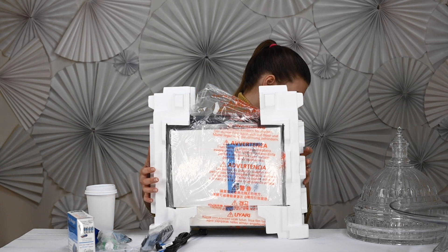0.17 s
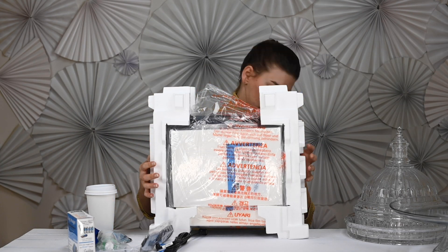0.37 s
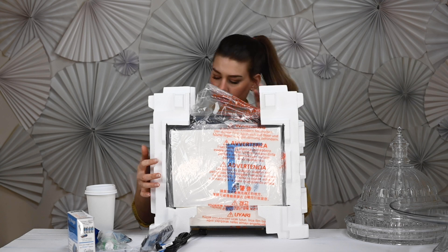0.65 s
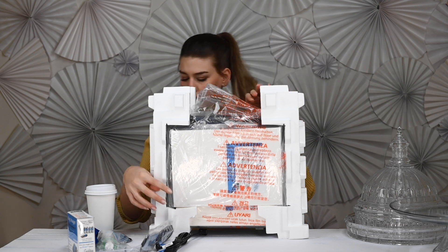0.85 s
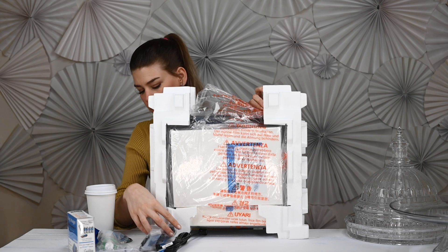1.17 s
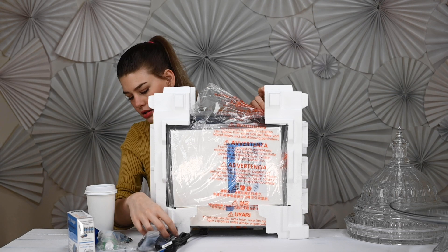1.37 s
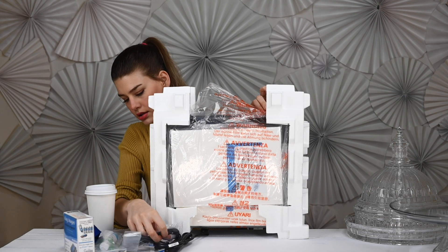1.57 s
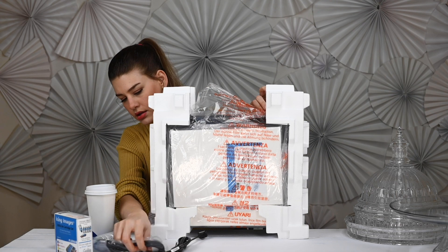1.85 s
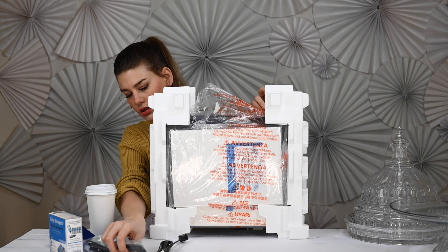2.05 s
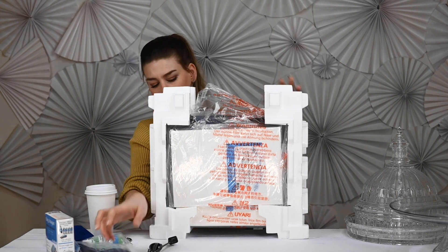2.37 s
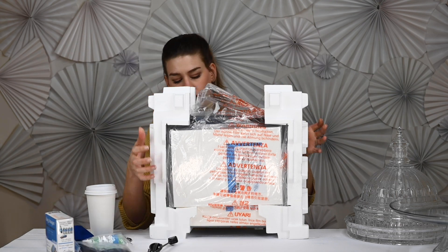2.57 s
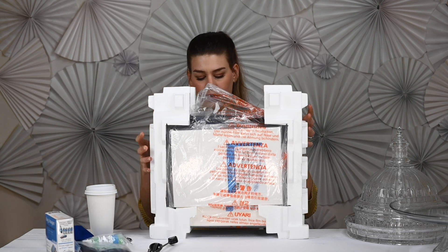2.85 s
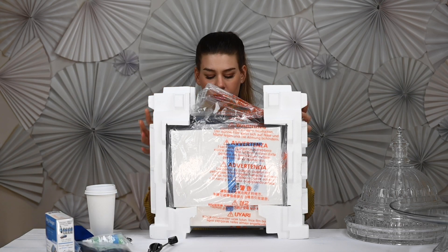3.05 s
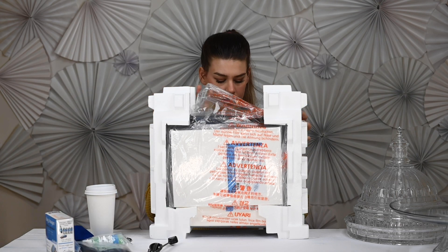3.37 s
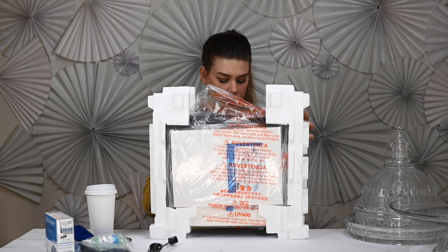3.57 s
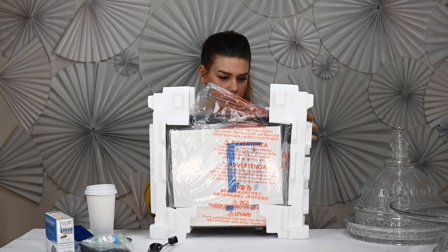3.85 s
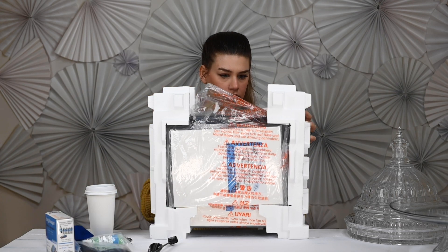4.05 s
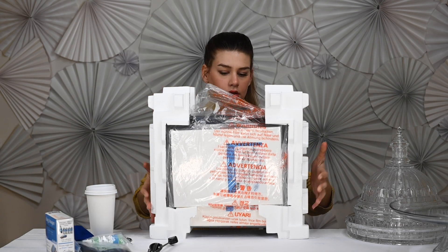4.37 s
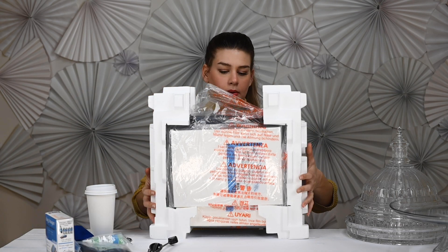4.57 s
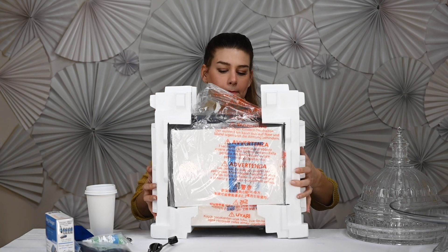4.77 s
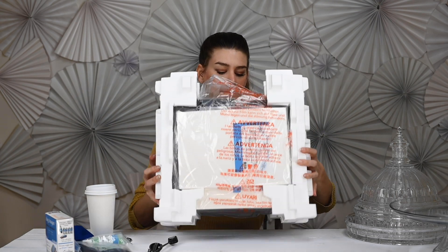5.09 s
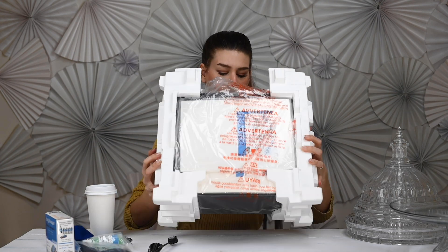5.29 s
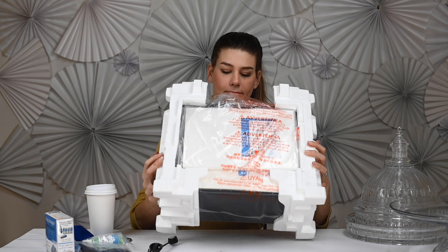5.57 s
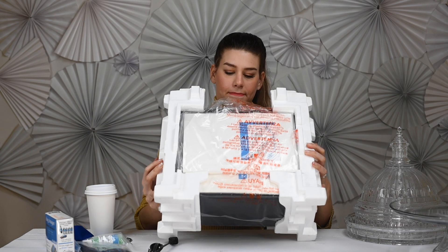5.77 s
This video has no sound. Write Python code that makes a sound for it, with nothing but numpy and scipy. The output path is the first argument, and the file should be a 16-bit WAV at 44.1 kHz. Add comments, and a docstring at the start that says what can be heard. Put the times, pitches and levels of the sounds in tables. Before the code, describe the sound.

Hands rub and crinkle plastic film over foam packing, small items drag across a table, then the package is lifted with creaking foam.

```python
"""Handling a wrapped package

Hands rub and grip a plastic-wrapped appliance held in foam packing blocks, on a table in a small room.
Rubbing is noisy friction; the film crinkles and snaps as short bursts that set resonances ringing.
Things slid across the tabletop make it drone, and the foam bumps and squeaks in gliding notes.
When the package is lifted, the foam creaks in separate slips whose treble arrives first."""
import sys
import numpy as np
from scipy import signal
from scipy.fft import rfft, irfft
from scipy.io import wavfile

SR = 44100
rng = np.random.default_rng(int(sys.argv[2]) if len(sys.argv) > 2 else 0)


def unload_wav(signal):
    """Save mono or channel-first audio to the path in sys.argv[1] as 16-bit WAV at rate SR, clipped to [-1, 1]."""
    wavfile.write(
        sys.argv[1],
        SR,
        np.round(np.clip(np.atleast_2d(signal).T, -1, 1) * 32767).astype(np.int16),
    )


N = 261072
TIME = np.arange(N) / SR
TOP_LIMIT_HZ = 16150  # upper edge of the whole sound


def amp(db):
    """Turns decibels into gain."""
    return 10 ** (np.asarray(db) / 20)


def unit(x):
    """Scales a sound to an rms (average strength) of 1."""
    return x / np.sqrt(np.mean(x ** 2) + 1e-20)


def read(points, hz):
    """Reads a (Hz, value) table along a log-frequency axis."""
    table_hz, value = np.transpose(points)
    return np.interp(np.log(hz + 1), np.log(table_hz), value)


def curve(rows):
    """Gives each column of a timed table at every sample, with straight lines between rows."""
    s, *columns = np.transpose(rows)
    return [np.interp(TIME, s, column) for column in columns]


def add(mix, s, sound):
    """Mixes a sound in at time s (seconds)."""
    part = mix[round(s * SR):][:len(sound)]
    part += sound[:len(part)]


def band(x, order, hz, kind="low"):
    """Keeps only part of the spectrum, with a Butterworth filter."""
    return signal.sosfilt(signal.butter(order, hz, kind, fs=SR, output="sos"), x)


def colour(x, points, size=4096):
    """Gives a sound the listed spectrum without any pre-echo, so that clicks stay sharp."""
    gain_db = read(points, abs(np.fft.fftfreq(size, 1 / SR)))
    log_gain = np.log(amp(gain_db))
    # minimum phase: the response starts at once
    taps = np.fft.ifft(np.exp(np.conj(signal.hilbert(log_gain)))).real
    return signal.fftconvolve(x, taps[:size // 2])[:len(x)]


def ring(x, modes):
    """Drives a set of resonances, each given as (Hz, width in Hz, dB)."""
    out = 0
    for hz, width, db in modes:
        b, a = signal.iirpeak(min(hz, SR / 3), hz / width, SR)
        out = out + amp(db) * signal.lfilter(b, a, x)
    return out


def wander(rate_hz):
    """Makes a smooth random drift of rms 1."""
    return unit(band(rng.standard_normal(N), 2, rate_hz))


def grains(per_s, spread_db, cap=1.8):
    """Makes tiny random releases of friction: many small, a few large."""
    size = amp(spread_db * np.minimum(rng.exponential(1, N), cap))
    sign = rng.choice([-1, 1], N)
    happens = rng.random(N) < per_s / SR
    return unit(size * sign * happens)


def gesture(start, rise, hold):
    """Gain of one movement of the hand: it gathers speed, sags a little, then dies away."""
    onset_db, sag_db_per_s, contact_s = -18, -15, .04
    # slow movements also end slowly
    release_db, release_s, release_per_rise, release_bend = -22, 0.052, 0.68, 1.27
    t = TIME - start
    gathering = np.clip(1 - t / max(rise, .001), 0, None) ** 1.5
    ending = np.maximum(t - rise - hold, 0) / (release_s + release_per_rise * rise)
    contact = np.clip(1 + t / contact_s, 0, 1) ** 2  # fades in just before the start
    sag = sag_db_per_s * np.maximum(t - rise, 0)
    return contact * amp(onset_db * gathering + sag + release_db * ending ** release_bend)


def rub_levels():
    """Gains of foam scrape, rasp and film fizz; overlapping rubs add in power."""
    # A hand rubs over foam and film. Each row: start in seconds, rise in seconds, hold in seconds,
    # rasp level in dB, foam scrape in dB above the rasp, film fizz in dB above the rasp.
    rubs = [(0.072, 0.032, 0.071, -57.5, -7, -3), (0.251, 0.062, 0.12, -41.5, -1.5, 0),
            (0.484, 0.016, 0.017, -48.5, -9.5, -8), (0.631, 0.11, 0.0044, -52, 0, -2.5),
            (0.781, 0.0023, 0.0056, -42, -1, -3.5), (0.88, 0.0084, 0.02, -41, -15, 3.5),
            (0.895, 0.011, 0.13, -43, 0, -2.5), (1.0, 0.067, 0.062, -35.5, -0.5, -4.5),
            (1.163, 0.049, 0.06, -37, 0.5, -7), (1.311, 0.0097, 0.0087, -33.5, -4.5, -3.5),
            (1.349, 0.042, 0.072, -38.5, 2, -9.5), (1.506, 0.014, 0.047, -33.5, 1.5, -13),
            (1.616, 0.036, 0.11, -44, 2, -7), (1.838, 0.062, 0.05, -37, 2, -9.5),
            (1.976, 0.046, 0.33, -37, -3, -8.5), (2.387, 0.027, 0.053, -51, -4.5, -17),
            (2.458, 0.027, 0.01, -40, -7.5, -1.5), (2.748, 0.0041, 0.069, -53, 1.5, 1.5),
            (2.853, 0.015, 0.031, -39.5, -2.5, -3.5), (2.96, 0.024, 0.0045, -41.5, -7.5, -1),
            (3.04, 0.019, 0.015, -39.5, -6.5, -3), (3.11, 0.032, 0.019, -44.5, -1.5, -3.5),
            (3.226, 0.1, 0.015, -31.5, -4, -5.5), (3.43, 0.025, 0.041, -46, -4, -6),
            (3.51, 0.023, 0.052, -38.5, -4.5, -5.5), (3.606, 0.063, 0.053, -39.5, -5.5, -2.5),
            (3.801, 0.058, 0.066, -41.5, 1.5, -5.5), (3.917, 0.02, 0.17, -47.5, -3, -7.5),
            (4.103, 0.02, 0.035, -30.5, 1, -2.5), (4.457, 0.002, .04, -40, -9, -10),
            (4.469, 0.057, 0.14, -32.5, -5, -5.5), (4.677, 0.038, 0.023, -29, -4.5, -2.5),
            (4.753, 0.052, 0.036, -30, 1.5, -8), (4.82, 0.023, 0.0088, -29, -2.5, -11.5),
            (4.906, 0.0051, 0.082, -31, -1.5, -11), (5.038, 0.036, 0.026, -46, 4.5, -10),
            (5.148, 0.095, 0.28, -43, 1.5, -8), (5.588, 0.039, 0.23, -48.5, 6.5, -4.5),
            (5.763, 0.0016, 0.0017, -31.5, 1.5, 0.5), (5.905, 0.011, 0.01, -40.5, 0, -3.5)]
    power = np.zeros((3, N))
    for start, rise, hold, db, scrape_db, fizz_db in rubs:
        levels = amp([[db + scrape_db], [db], [db + fizz_db]])
        power += levels ** 2 * gesture(start, rise, hold) ** 2
    return np.sqrt(power)


def crinkles(count=20):
    """Many small creases, each pinging briefly in one of 20 pitches."""
    out = np.zeros(N)
    for hz in np.geomspace(900, 14000, count):
        clicks = grains(per_s=20, spread_db=4, cap=3.5)
        out += ring(clicks, [(hz, 0.16 * hz, 0)])
    return unit(out)


def rubbing():
    """Skin catches on foam beads and film; the grip flutters, and where it sticks the creases crackle."""
    # How much the contact sticks and crackles rather than glides.
    # Each row: time in seconds, crackle in dB relative to the smooth friction.
    stick_points = [(.9, -9), (1.25, -5), (2.4, -7.5), (2.7, -6), (4.7, -11.5), (5.1, -1), (5.72, -3),
                    (5.77, -9.5)]
    # Colours of foam scrape, rasp and film fizz. Each row: frequency in Hz, strength in dB per Hz.
    scrape_colour = [(40, -48), (120, -24.5), (240, -7.5), (350, -11.5), (520, -3.5), (800, 1), (1350, 2.5),
                     (1900, -1), (3000, -10), (6000, -45.5)]
    rasp_colour = [(900, -20), (1700, -12), (2250, 0), (2900, 1), (3500, 1), (4300, 3.5), (5300, 2),
                   (6500, -9), (8000, -13.5), (14000, -58)]
    fizz_colour = [(3500, -42), (6000, 2.5), (7300, 0), (8700, 0), (10500, -0.5), (12000, 0.5), (13600, -2),
                   (16000, -7.5)]
    stick = amp(curve(stick_points)[0])
    grip = amp(3.74 * np.sqrt(np.minimum(stick, 1)) * wander(rate_hz=110))
    crackle = unit(crinkles() + .7 * grains(per_s=240, spread_db=2.0, cap=3.0))
    out = np.zeros(N)
    for spectrum, level in zip((scrape_colour, rasp_colour, fizz_colour), rub_levels()):
        smooth = grains(per_s=20000, spread_db=3.3)
        drive = grip * (smooth + stick * crackle) / np.hypot(1, stick)
        # the contact moves, so a nearby reflection keeps shifting the colour
        lag = SR * 0.000667 * amp(3.6 * wander(rate_hz=2.57))  # in samples
        strength = .55 * np.tanh(2 * wander(rate_hz=4))
        drive = drive + strength * np.interp(np.arange(N) - lag, np.arange(N), drive)
        out += level * unit(colour(drive, spectrum))
    return out


def strokes():
    """A finger wiping along the foam lands quickly and slows down, hissing in one broad resonance."""
    # Each row: start in seconds, length in seconds, resonance in Hz, level in dB.
    wipes = [(0.289, 0.17, 2680, -42.5), (0.634, 0.24, 535, -60.5), (0.891, 0.044, 4200, -34),
             (1.899, 0.061, 5400, -34), (2.481, 0.027, 12500, -33.5), (2.749, 0.024, 720, -48),
             (2.759, 0.088, 2970, -45), (3.292, 0.083, 1280, -37), (4.842, 0.036, 4180, -29.5)]
    out = np.zeros(N)
    friction = grains(per_s=9000, spread_db=3)
    for s, length, hz, db in wipes:
        u = np.arange(0, 1, 1 / (length * SR))  # progress from 0 to 1
        mode = [(hz, 0.36 * hz, 0)]
        hiss = ring(ring(friction[round(s * SR):][:len(u)], mode), mode)
        swell = np.minimum(20 * u, 1) * np.sqrt(1 - u)
        add(out, s, amp(db) * unit(hiss * swell))
    return out


def package():
    """The hollow package booms softly when bumped and rumbles while carried; slow, heavy pushes also thud."""
    # Soft bumps of hands on the package.
    # Each row: start in seconds, peak of the knock in dB, time in seconds for the push to fade by 60 dB.
    bumps = [(0.41, -36.5, 0.13), (0.887, -42, 0.5), (1.062, -41, 0.47), (1.672, -40.5, 0.36),
             (2.46, -33, 0.19), (2.867, -46.5, 0.39), (3.52, -35, 0.44), (4.462, -43, 0.092),
             (4.954, -34.5, 0.14), (5.516, -32, 0.23), (5.742, -32, 0.087), (5.802, -43.5, 0.78)]
    # Hollow rumble as the package is gripped and carried. Each row: time in seconds, level in dB.
    carry = [(4.45, -76), (4.6, -68.5), (4.84, -51), (5.17, -61), (5.22, -48.5), (5.54, -42), (5.59, -62),
             (5.63, -37.5), (5.92, -77)]
    # Resonances of the hollow package. Each row: frequency in Hz, width in Hz, strength in dB.
    box_modes = [(200, 42, 2.5), (248, 48, 8), (333, 74, -3.5)]
    force = amp(curve(carry)[0]) * (TIME > carry[0][0])
    weight, blows = np.zeros(N), np.zeros(N)
    knock = ring(np.pad(signal.windows.hann(150), (0, SR)), box_modes)
    for s, db, t60 in bumps:
        push = amp(db - 8.0 - 60 * TIME[:SR] / t60)
        add(blows, s, amp(db) * knock / abs(knock).max())
        add(force, s, push)
        add(weight, s, push * (t60 / 0.61) ** 2)  # slower pushes carry more weight
    boom = ring(grains(per_s=2600, spread_db=1.5), box_modes)
    boom = unit(band(boom, 2, [150, 520], "band"))
    thud = unit(band(rng.standard_normal(N), 3, [48, 170], "band"))
    return blows + force * boom + weight * thud


def snaps(size=700):
    """A crease flips: a ragged crack, then the patch of plastic around it rings for a few milliseconds."""
    # The loudest creases of film and bits of plastic snapping. Each row: start in seconds,
    # level in dB before the final trim, ring in Hz, treble crack in dB above the ring.
    creases = [(0.413, -30.5, 2200, -3), (0.4384, -27, 1600, -2), (.5484, -48, 4190, 7),
               (0.7845, -36, 3100, -1), (0.9162, -20, 2970, -2), (1.065, -23.5, 4500, -9),
               (1.0802, -23.5, 2750, -8), (1.1176, -17.5, 3560, -10), (1.121, -17, 4600, 0),
               (1.144, -26, 3990, -12), (1.193, -31, 4500, 4), (1.199, -27.5, 4000, 2),
               (1.25, -27, 2300, -3), (1.258, -29, 2290, -1), (1.266, -26, 2090, -1),
               (1.2733, -28, 2300, -6), (1.4096, -23.5, 2580, -20), (1.4546, -26, 2980, -4.5),
               (1.4967, -20.5, 2570, -15), (1.528, -17.5, 2280, -5), (1.558, -19.5, 2160, -21),
               (1.57, -26.5, 4300, 16), (1.5834, -15.5, 3210, -8.5), (1.643, -30, 2500, 0),
               (1.654, -27.5, 2400, -3), (1.67, -21, 4480, -20), (1.7384, -13.5, 1870, -1),
               (1.9559, -25, 1650, -25.5), (2.062, -18.5, 2940, 1), (2.3035, -23.5, 3470, -12),
               (2.3165, -27.5, 3550, 0), (2.3602, -25.5, 3600, -18), (2.4047, -28.5, 4300, -18),
               (2.4184, -33, 3800, -15), (2.486, -27, 4970, -2), (3.1905, -30.5, 3230, -20),
               (3.4905, -34.5, 5240, -6), (3.6172, -33.5, 5660, -16), (3.8465, -19, 2660, -10),
               (3.8541, -17.5, 3800, -9.5), (3.8782, -20.5, 4600, -13), (4.161, -15.5, 3340, -8),
               (4.1753, -20.5, 2200, -7), (4.405, -53.5, 4500, 4), (4.5435, -17, 3130, -3.5),
               (4.5608, -23, 4300, -3), (4.7858, -16.5, 3130, -16), (4.7898, -19.5, 3770, -16)]
    out, t = np.zeros(N), np.arange(size) / SR
    for s, db, hz, crack_db in creases:
        flip = .26 * rng.standard_normal(size) * np.exp(-t / .0013)
        flip[0] = 1
        # its own pitch, between two resonances of the packing behind it
        body = ring(flip, [(1850, 380, 1), (hz, 0.27 * hz, 0), (4400, 900, -1)])
        body = band(body, 2, 7500)
        top_hz = min(6800 + 1.7 * hz, TOP_LIMIT_HZ)  # small patches crack higher
        crack = band(flip, 2, [6000, top_hz], "band")
        both = unit(body) + amp(crack_db) * unit(crack)
        add(out, s, amp(db) * both / np.hypot(1, amp(crack_db)))
    return amp(-9.5) * out


def tabletop():
    """Sliding things catch and judder, and set the table panel droning."""
    # Things pushed across the tabletop.
    # Each row: start in seconds, rise in seconds, hold in seconds, level in dB.
    pushes = [(1.339, 0.015, 0.031, -29.5), (1.558, 0.069, 0.16, -39.5), (1.787, .08, 0.016, -35),
              (1.877, 0.18, 0.16, -25.5)]
    # Resonances of the table panel. Each row: frequency in Hz, width in Hz, strength in dB.
    table_modes = [(210, 35, -4), (320, 44, -7.5), (400, 70, 4.5), (534, 36, -2.5), (629, 100, -0.5),
                   (755, 75, -1.5), (1058, 77, 3), (1390, 91, -5)]
    # Judder of a dragged thing, rising and falling with its speed.
    # Each row: time in seconds, pitch in Hz.
    judder_pitch = [(1.9, 560), (2.08, 665), (2.2, 558)]
    judder_width_hz, judder_db = 35, -6
    catches = grains(per_s=600, spread_db=2.5)
    # a resonance that follows the moving pitch: turn it down to 0 Hz, smooth it, turn it back up
    turn = np.exp(2j * np.pi * np.cumsum(curve(judder_pitch)[0]) / SR)
    r = np.exp(-np.pi * judder_width_hz / SR)
    judder = (turn * signal.lfilter([1 - r], [1, -r], catches / turn)).real
    drone = unit(ring(catches, table_modes)) + amp(judder_db) * unit(judder)
    power = sum((amp(db) * gesture(start, rise, hold)) ** 2 for start, rise, hold, db in pushes)
    return np.sqrt(power) * unit(band(drone, 2, [100, 1600], "band"))


def squeaks():
    """Foam sticks and lets go fast enough to give an unsteady gliding note."""
    # Short gliding squeaks and scuffs.
    # Each row: start in seconds, length in seconds, start pitch in Hz, end pitch in Hz, level in dB.
    glides = [(1.345, 0.009, 1083, 547, -28.5), (1.3555, 0.008, 908, 665, -21.5),
              (1.615, 0.021, 1486, 601, -33.5), (3.858, 0.12, 743, 212.4, -52.5),
              (4.8396, 0.014, 1674, 1080, -30), (4.925, 0.011, 1000, 1700, -30.5)]
    out, waver = np.zeros(N), wander(rate_hz=290)
    for s, length, start_hz, end_hz, db in glides:
        u = np.arange(0, 1, 1 / (length * SR))  # progress from 0 to 1
        unsteady = amp(1.9 * waver[round(s * SR):][:len(u)])
        hz = start_hz * (end_hz / start_hz) ** u * unsteady
        phase = 2 * np.pi * np.cumsum(hz) / SR
        swell = np.sin(np.pi * np.sqrt(u)) * amp(0.84 * waver[:len(u)])
        note = np.sin(phase) + 0.093 * np.sin(2 * phase)
        add(out, s, amp(db) * unit(swell * note))
    return out


def creaks(size=1024):
    """Each slip sends a bending wave through the foam, treble first; a drawn-out echo and a short rattle follow."""
    # The strained foam gives way in slips, often in short runs.
    # Each row: start in seconds, level in dB before the final trim, centre in Hz.
    slips = [(1.3673, -24, 940), (1.3731, -31, 430), (1.612, -27, 1700), (3.8655, -30.5, 2800),
             (4.9178, -30.5, 2970), (4.956, -27, 1930), (4.994, -21.5, 2870), (5.06, -32, 2860),
             (5.0908, -37, 2200), (5.0951, -28, 1900), (5.1564, -35, 5160), (5.1935, -35, 1970),
             (5.2026, -20, 1530), (5.2097, -26, 1730), (5.2441, -31, 2000), (5.2514, -24, 1900),
             (5.2773, -21.5, 3140), (5.2862, -24, 2000), (5.386, -32, 1600), (5.4163, -26.5, 1900),
             (5.4195, -26, 990), (5.43, -22.5, 910), (5.4411, -22, 690), (5.497, -33, 1490),
             (5.513, -28, 2800), (5.5145, -29, 2300), (5.5213, -18.5, 1510), (5.528, -19.5, 1270),
             (5.535, -21.5, 1340), (5.5435, -19, 925), (5.5962, -32, 1890), (5.614, -35, 2200),
             (5.6238, -24.5, 950), (5.6371, -25, 1200), (5.676, -23, 2600), (5.686, -23, 1260),
             (5.7415, -25.5, 2600)]
    # Rattle of the loose packing. Each row: frequency in Hz, width in Hz, strength in dB.
    rattle_modes = [(2230, 100, 6.5), (4330, 270, 6.5), (6640, 640, -8.5), (11000, 5000, -14.5)]
    rattle_db, rattle_spread_db = -8, 11.5
    # travel times near 1 kHz: straight out, and by way of the far end of the block
    slip_delay_s, echo_delay_s, echo_db = .0005, .0042, -14
    beads_per_khz = 0.09  # sharp slips are more ragged than dull ones
    foam_top_hz = 8000  # the foam soaks up the treble
    out, t = np.zeros(N), np.arange(size) / SR
    f = np.fft.rfftfreq(size, 1 / SR) + 1
    # phase turn per second of travel: high frequencies move faster
    travel = -2j * np.pi * np.cumsum(np.sqrt(1000 / (f + 100))) * SR / size
    paths = np.exp(travel * slip_delay_s) + amp(echo_db) * np.exp(travel * echo_delay_s)
    for s, db, hz in slips:
        beads = beads_per_khz * hz / 1000 * rng.standard_normal(size) * np.exp(-t / .0012)
        beads[0] = 1  # the main slip, with smaller ones on its heels
        resonance = 1 / (1 + .62j * (f / hz - hz / f)) ** 2
        damping = 1 / (1 + 1j * f / foam_top_hz)
        wave = irfft(rfft(beads) * paths * resonance * damping)
        # each spot that slips favours other parts of the rattle
        modes = [(mode_hz, width, mode_db + rattle_spread_db * rng.standard_normal())
                 for mode_hz, width, mode_db in rattle_modes]
        rattle = ring(rng.standard_normal(size) * np.exp(-t / 0.0023), modes)
        add(out, s, amp(db) * (unit(wave) + amp(rattle_db) * unit(rattle)))
    return amp(-9) * out


def room(x, size=22050):
    """A small furnished room: dense weak reflections, fading at a different rate in each pitch range."""
    # Each row: frequency in Hz, time in seconds for the reflections to fade by 60 dB.
    fade_times = [(150, 0.4), (1000, 0.15), (5000, 0.25), (15000, 0.037)]
    hz, t, z = signal.stft(rng.standard_normal(size), SR, nperseg=256)
    fade = amp(-60 * t / read(fade_times, hz)[:, None])
    tail = signal.istft(z * fade, SR, nperseg=256)[1]
    tail = np.concatenate([np.zeros(round(.004 * SR)), tail])  # reflections start 4 ms late
    return signal.fftconvolve(x, tail / np.linalg.norm(tail))[:N]


def room_tone():
    """The quiet steady noise of the room: random noise given a fixed colour."""
    # Each row: frequency in Hz, strength in dB per Hz.
    tone_colour = [(30, -3.5), (250, -4.5), (420, -5), (800, -2), (1700, -7), (16000, -17)]
    return amp(-72.5) * unit(colour(rng.standard_normal(N), tone_colour))


def scene():
    """All the handling, its reflections and the quiet room tone."""
    near = rubbing() + strokes() + package() + snaps() + tabletop() + squeaks() + creaks()
    return (near + amp(-16.0) * room(near) + room_tone())[None]


def record(dry):
    """A gentle cut of the lowest bass and a steep limit at the top of the treble."""
    lean = band(dry, 1, 45, "high")
    top_limit = signal.firwin(401, TOP_LIMIT_HZ, window=("kaiser", 8), fs=SR)
    return signal.oaconvolve(lean, top_limit[None], "same")


dry = scene()
out = record(dry)
unload_wav(out)
```